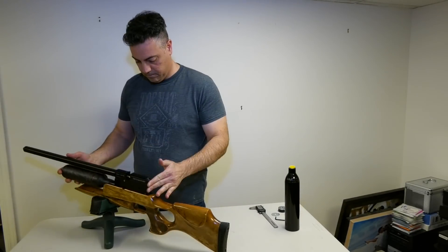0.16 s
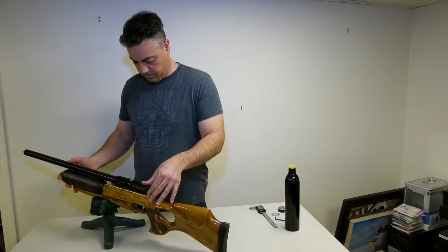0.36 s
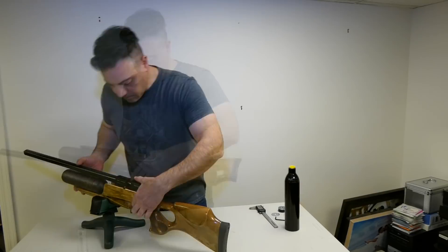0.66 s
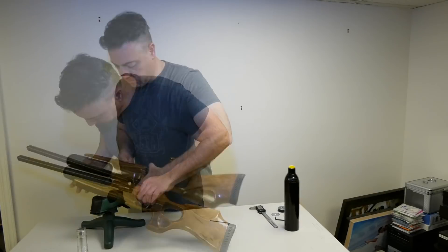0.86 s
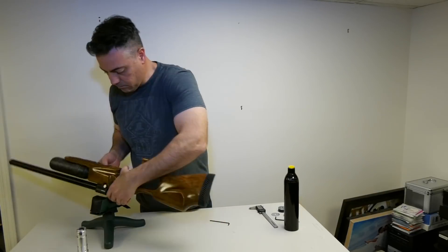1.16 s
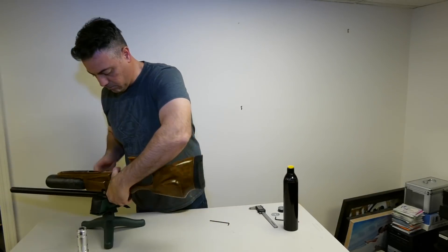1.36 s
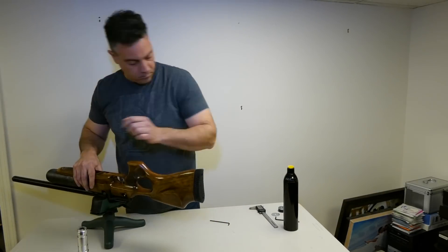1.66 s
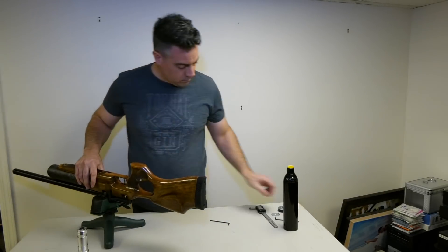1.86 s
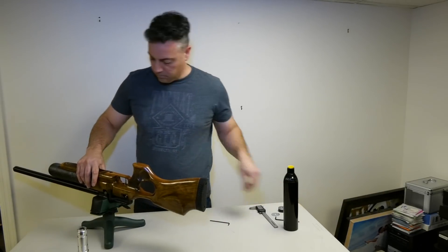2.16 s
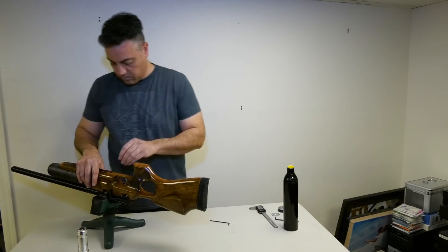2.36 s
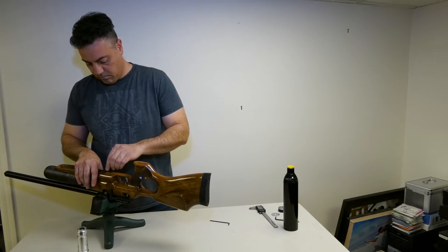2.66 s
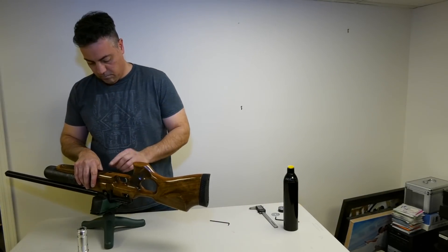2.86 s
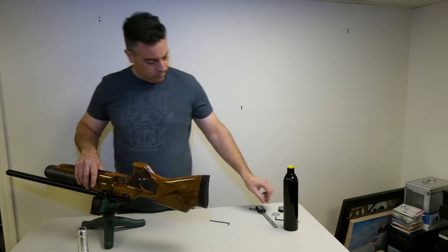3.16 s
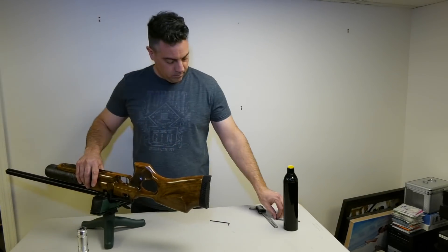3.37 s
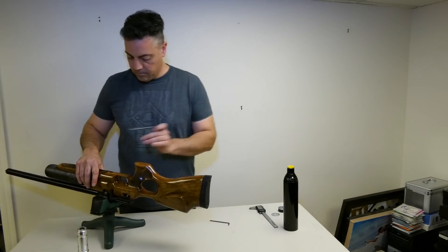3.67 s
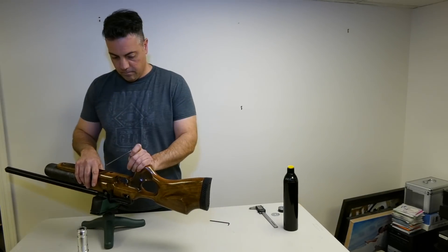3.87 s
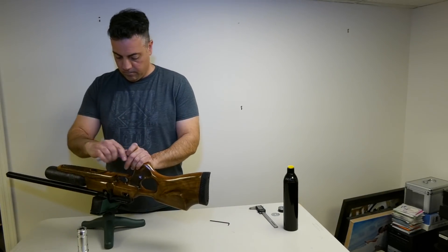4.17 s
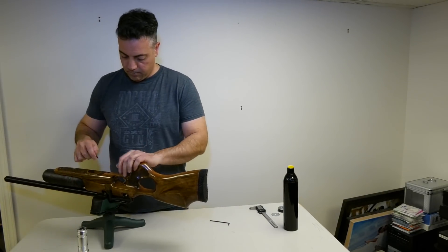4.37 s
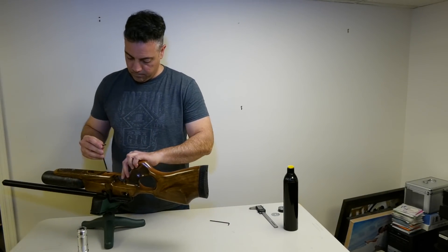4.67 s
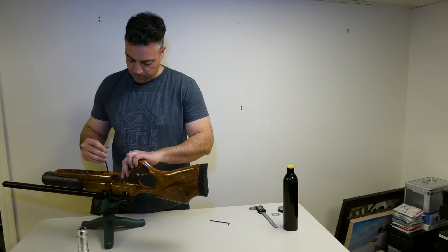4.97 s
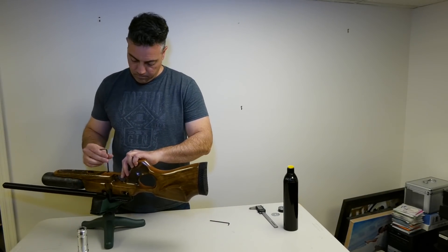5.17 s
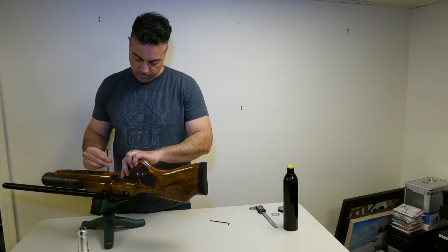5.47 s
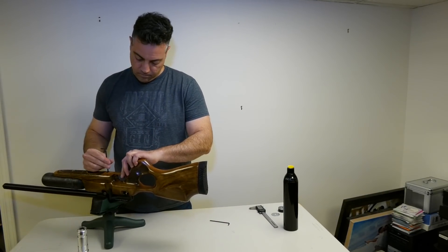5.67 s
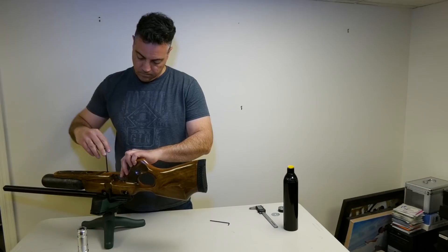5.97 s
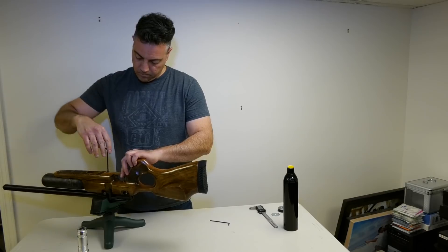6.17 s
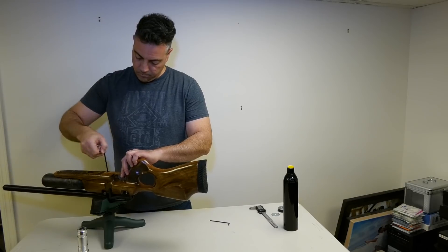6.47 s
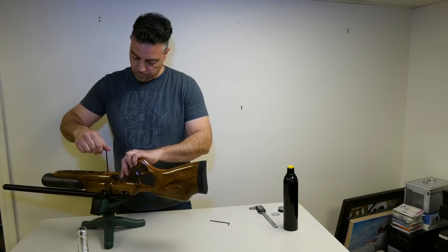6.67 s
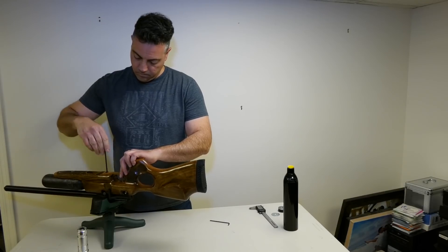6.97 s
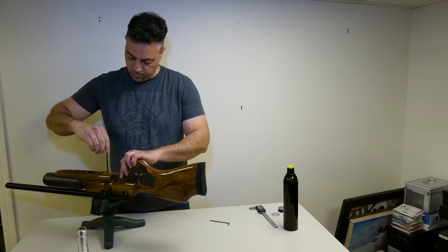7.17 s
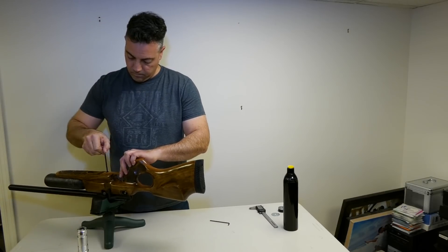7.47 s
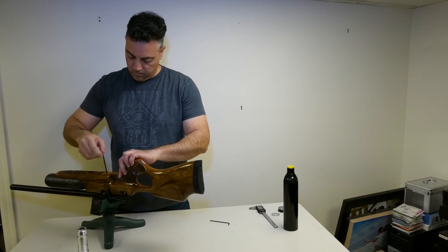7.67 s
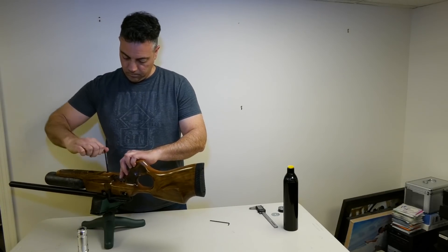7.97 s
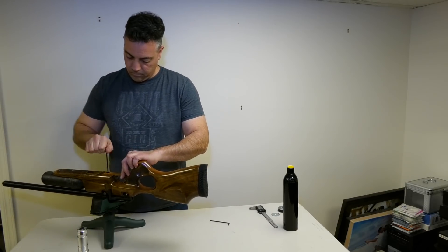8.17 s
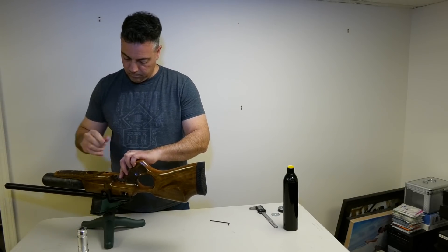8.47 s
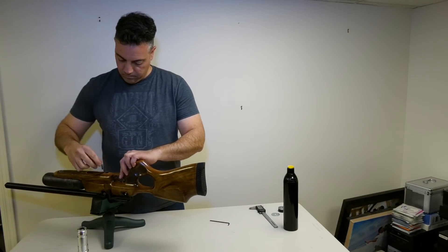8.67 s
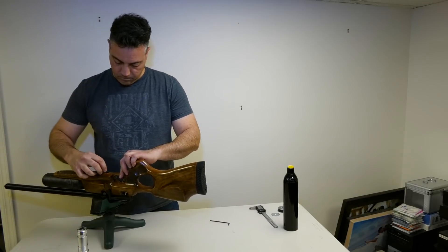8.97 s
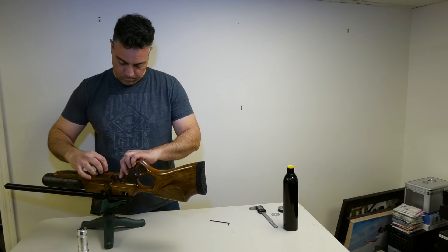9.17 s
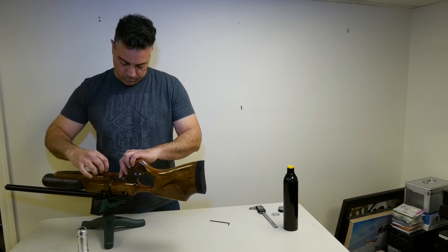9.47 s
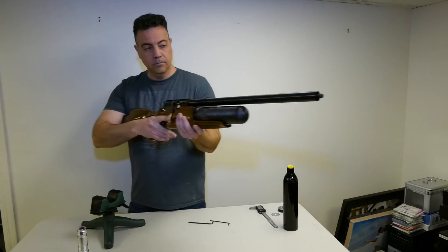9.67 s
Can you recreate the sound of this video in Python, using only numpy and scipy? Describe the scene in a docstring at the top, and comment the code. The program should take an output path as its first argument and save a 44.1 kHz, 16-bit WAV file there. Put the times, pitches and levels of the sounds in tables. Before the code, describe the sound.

From near silence a fan's airy hum fades in. Sleeves brush and a wooden gun stock bumps softly into its rest; small tools clatter on a hollow bench. A loose steel part scrapes, squeaks and rattles brightly, the tools clatter again, then a hex key ticks and grinds irregularly in a screw. Small, short-echo room, stereo microphone, action well to the left.

```python
"""An air rifle is put together on a bench in a small room, heard well to the left.
The hum and rushing air of a fan fade in over filtered noise and wavering tones; sleeve or palm brushes in fine grains.
The wooden stock bumps into its rest, a fitting ticks and small tools clatter: contact noise rings tuned resonances.
A loose steel part scrapes, squeaks and rattles into its seat by stick-slip, and the tools clatter once more.
Last, a hex key ticks and grinds in the stock screw, over a faint rumble while weight bears on it."""
import sys
import numpy as np
from scipy import signal
from scipy.fft import rfft, irfft
from scipy.io import wavfile
from scipy.ndimage import uniform_filter1d

SR = 44100
rng = np.random.default_rng(int(sys.argv[2]) if len(sys.argv) > 2 else 0)


def bounce(signal):
    """Save signal as a 16-bit WAV file at the path given by the first command-line argument."""
    frames = np.transpose(np.atleast_2d(signal))
    limited = np.clip(frames, -1, 1)
    pcm = np.round(limited * 32767).astype(np.int16)
    wavfile.write(sys.argv[1], SR, pcm)


N = 432621
TIME = np.arange(N) / SR

# spectrum of a bare steel contact: f/Hz, relative level/dB
STEEL_CONTACT = [(200, -44.5), (1300, -20.5), (1800, 5), (2250, -5.5), (2800, 7.5), (3800, -0.5), (5000, 6),
                 (6600, 4), (7900, -6.5), (9600, 2), (11500, -6.5), (16000, -17)]


def undb(db):
    """Turn decibels into amplitude gain."""
    return 10 ** (np.asarray(db) / 20)


def unit(x):
    """Scale to an energy of one."""
    return x / np.sqrt(np.sum(x ** 2))


def steady(x):
    """Scale to an rms of one."""
    return unit(x) * np.sqrt(len(x))


def through(x, response):
    """Pass a sound through an impulse response, keeping its length."""
    return signal.oaconvolve(x, response)[:len(x)]


def add(track, s, sound):
    """Mix a sound into a track at a time in seconds."""
    part = track[int(s * SR):][:len(sound)]
    part += sound[:len(part)]


def colour(points, size=4096):
    """Minimum-phase impulse response with the given (Hz, dB) spectrum, by way of its cepstrum."""
    hz, db = np.transpose(points)
    bins_hz = np.arange(size // 2 + 1) * SR / size
    level_db = np.interp(np.log(bins_hz + 1), np.log(hz), db)
    cepstrum = irfft(np.log(undb(level_db)))
    # folding the cepstrum forward makes the response causal
    cepstrum[1:size // 2] *= 2
    cepstrum[size // 2 + 1:] = 0
    return unit(irfft(np.exp(rfft(cepstrum))))


def ring(hz, width):
    """One resonance; the wider it is in Hz, the faster it fades."""
    t = TIME[:SR // 2]
    return width * np.exp(-np.pi * width * t) * np.cos(2 * np.pi * hz * t)


def body(spectrum, modes, ring_db):
    """A struck object: a broad crack and the ring of its modes."""
    ringing = sum(undb(db) * ring(hz, width) for hz, width, db in modes)
    response = undb(ring_db) * unit(ringing)
    add(response, 0, colour(spectrum))
    return unit(response)


def contact(chatter_s, size=4096):
    """One touch: a dying swarm of tiny rebounds."""
    age = TIME[:size] / max(chatter_s, 1e-4)
    rebounds = rng.standard_normal(size)
    return unit(rebounds * np.abs(rebounds) * np.exp(-age))


def soften(x, hz):
    """A softer contact loses the treble above hz."""
    lowpass = signal.butter(1, min(hz, SR / 2 - 1), fs=SR, output="sos")
    return signal.sosfilt(lowpass, x)


def walk(rate):
    """Slow chance: random levels, rate per second, smoothed to a spread of one."""
    k = int(SR / rate)
    levels = np.repeat(rng.standard_normal(N // k + 1), k)[:N]
    return steady(uniform_filter1d(levels, k))


def room(x, wet_db, right_db, low_t60=0.17, high_t60=0.11, gap_s=0.00066, echo_right_db=-12, bass_hz=120, count=2):
    """Direct sound, count samples earlier on the right, and a short diffuse tail whose bass lasts longest."""
    # small things radiate little bass
    x = signal.sosfilt(signal.butter(2, bass_hz, "high", fs=SR, output="sos"), x)
    t = TIME[:SR // 3]
    onset = 1 - np.exp(-(t / gap_s) ** 2)
    tails = []
    for noise in rng.standard_normal((2, len(t))):
        low = soften(noise, 570)
        tail = low * undb(-60 * t / low_t60) + (noise - low) * undb(-60 * t / high_t60)
        tails.append(undb(wet_db) * through(x, unit(tail * onset)))
    left = x + tails[0]
    right = undb(right_db) * np.roll(x, -count) + undb(echo_right_db) * tails[1]
    return np.array([left, right])


def fan(air_db=-43, hum_db=0, waver_db=1.5, flutter_db=2.5, right_db=-14, diffuse_db=-15, bass_db=-66, rumble_db=-76):
    """Rushing air with wavering tones; the right side hears it partly through the room."""
    # spectrum of the rushing air: f/Hz, relative level/dB
    air_spectrum = [(25, -10), (55, -23), (90, -12), (125, -13.5), (230, -2), (320, -1), (430, 1.5),
                    (600, 2.5), (790, 0.5), (1030, 1), (1370, -5.5), (2300, -10), (5000, -18.5),
                    (16000, -28)]
    # tones of the motor and blades: f/Hz, wander/Hz, relative rms level/dB
    tones = [(392, 2.2, -50.5), (872, 2.8, -59), (944, 3.28, -57), (969, 2.99, -53.5), (1040, 2.886, -56.5),
             (1097, 3.15, -56.5), (1232, 6.08, -59.5), (1476, 11.88, -60), (1547, 3.95, -62),
             (1937, 1.89, -64), (14250, 40, -82)]
    air, diffuse = (steady(through(rng.standard_normal(N), colour(air_spectrum))) * undb(air_db) for _ in range(2))
    hum = 0
    for hz, wander_hz, db in tones:
        pitch_hz = hz + wander_hz * walk(20)
        tone = np.sin(2 * np.pi * np.cumsum(pitch_hz) / SR)
        hum = hum + undb(db + hum_db) * steady(tone * undb(flutter_db * walk(10)))
    near = air * undb(waver_db * walk(2.96)) + hum
    far = undb(right_db) * np.roll(near, -2) + undb(diffuse_db) * diffuse
    # two standing waves of the room reach both sides alike
    waves = [(93.0, 22, rumble_db), (212.4, 29, bass_db)]
    boom = sum(undb(db) * steady(through(rng.standard_normal(N), ring(hz, width))) for hz, width, db in waves)
    return np.array([near, far]) + boom


def hiss(db=-73):
    """Each microphone has its own faint hiss: independent white noise."""
    return undb(db) * rng.standard_normal((2, N))


def sweeps(rows):
    """Gain of passing sweeps: each swells to its fastest moment and fades; their powers add."""
    power = np.zeros(N)
    for s, rise_s, fall_s, db in rows:
        away = np.maximum((s - TIME) / rise_s, (TIME - s) / fall_s)
        power += (undb(db) * np.exp(-away)) ** 2
    return np.sqrt(power)


def brushing(grain_db=3, uneven_db=1):
    """Cloth and skin catch and let go in countless tiny grains."""
    # spectrum of the brushing: f/Hz, relative level/dB
    cloth = [(200, -27), (1000, 0.5), (2500, -0.5), (5000, -1), (9000, -4.5), (16000, -12.5)]
    # a sleeve or palm passing over the stock: fastest at t/s, speeding up/s, slowing down/s, relative level/dB
    passes = [(0.64, 0.058, 0.11, -52.5), (0.88, 0.053, 0.039, -42), (1.36, 0.075, 0.17, -42),
              (1.358, 0.008, 0.01, -33), (1.41, 0.006, 0.015, -37), (1.457, 0.005, 0.017, -35),
              (1.78, 0.063, 0.25, -41.5), (3.09, 0.009, 0.03, -36), (3.15, 0.036, 0.14, -43.5),
              (3.9, 0.012, 0.05, -48), (4.02, 0.04, 0.023, -47), (4.45, 0.45, 0.085, -54),
              (9.66, 0.12, 0.14, -52), (9.805, 0.018, 0.05, -35.5)]
    grains = rng.standard_normal(N) * undb(grain_db * walk(600) + uneven_db * walk(24.68))
    rustle = steady(through(grains, colour(cloth)))
    return room(rustle * sweeps(passes), wet_db=-3.5, right_db=-39)


def stock(blow_db=23.0, thud_db=-3, thud_hz=600, grip_shift=0.028):
    """Dull bumps of the wooden stock in its padded rest: the weight lands softly while the surfaces chatter."""
    # bumping and dragging in the rest: t/s, relative level/dB, hardness f/Hz, chatter decay/s
    bumps = [(1.346, -21.5, 1200, 0.0013), (1.352, -15, 990, 0.011), (1.365, -21, 600, 0.024),
             (1.392, -41, 400, .008), (1.412, -24, 2500, 0.0057), (1.425, -29, 600, .012),
             (1.445, -22, 2000, 0.012), (1.459, -28, 600, .014), (1.568, -36, 2500, .005),
             (1.589, -37, 250, 0.0077), (3.891, -41, 400, .008), (5.712, -30.5, 220, 0.0097),
             (6.695, -29.5, 80, 0.011), (7.001, -32, 110, 0.01), (7.255, -32.5, 130, 0.01),
             (7.291, -31, 110, 0.022), (7.49, -33, 300, 0.012), (7.983, -25, 420, .005),
             (8.52, -33.5, 119, 0.02)]
    # resonances of the stock: f/Hz, width/Hz, relative level/dB
    wood_modes = [(141, 9.4, -7), (193, 39, -16), (243, 43, 2.5), (308, 18, 5.5), (463.5, 15.4, 13),
                  (518, 12, -7), (574, 15, 7.5), (1070, 65, 0.5)]
    # spectrum of its bare contact: f/Hz, relative level/dB
    wood_contact = [(50, -54), (110, -19.5), (210, 0.5), (520, -2), (750, -8.5), (1200, -2), (2500, -9.5),
                    (5000, 3.5), (16000, -32)]
    track = np.zeros(N)
    for s, db, hz, chatter_s in bumps:
        # the hands hold it differently each time, which shifts its resonances a little
        held = [(f * np.exp(grip_shift * rng.standard_normal()), width, mode_db) for f, width, mode_db in wood_modes]
        wood = body(wood_contact, held, ring_db=-6)
        thud = undb(thud_db) * unit(soften(soften(wood, thud_hz), hz))
        chatter = unit(through(soften(wood, hz), contact(chatter_s)))
        bump = unit(soften(thud + chatter, 2 * hz))
        add(track, s, undb(db + blow_db) * bump)
    return room(track, wet_db=-5.0, right_db=-18.0, echo_right_db=-7.5)


def ticks(rows, modes, ring_db, creep_db, creep_s=0.003, place_db=2, size=1024, count=300):
    """Each tick is a swell of tiny slips, with creep from count samples before; its place decides which modes ring."""
    track = np.zeros(N)
    t = (np.arange(size) - count) / SR
    for s, db, build_s, body_db, treble_db in rows:
        age = np.maximum(t, 0) / max(build_s, 1e-4)
        creep = undb(creep_db) * np.exp(-np.abs(t - build_s) / creep_s)
        swell = age * np.exp(1 - age) + creep
        slips = rng.standard_normal(size) * swell
        struck = [(hz, width, mode_db + place_db * rng.standard_normal()) for hz, width, mode_db in modes]
        tint = colour([(2000, body_db), (2700, 0), (6500, 0), (9000, treble_db)])
        tick = unit(through(through(body(STEEL_CONTACT, struck, ring_db), slips), tint))
        add(track, s + t[0], undb(db) * tick)
    return track


def fidgets(db=-41, spread_db=3, build_s=0.0012, body_db=6, treble_db=-4, count=20):
    """Rows of faint ticks at chance moments, as the key shifts in its socket."""
    from_s, until_s = 4.4, 9.75  # the key is in the hand
    rows = []
    for when, force in rng.random((count, 2)):
        s = from_s + when * (until_s - from_s)
        rows.append((s, db + spread_db * (2 * force - 1), build_s, body_db, treble_db))
    return rows


def sliding(modes, ring_db, dull_hz, slip_spread_db=5, slips_per_s=3000):
    """Stick-slip friction: a dense, uneven train of slips ringing the steel."""
    moments = rng.random(N) < slips_per_s / SR
    slips = moments * rng.choice([-1, 1], N) * undb(slip_spread_db * rng.standard_normal(N))
    dulled = soften(soften(slips, dull_hz), dull_hz)
    return steady(through(dulled, body(STEEL_CONTACT, modes, ring_db)))


def strokes(rows, attack_share, release_s):
    """Gain of sliding strokes: each gathers speed over a share of its length, holds, then dies away."""
    gain = np.zeros(N)
    for s, length_s, db in rows:
        attack = np.clip((TIME - s) / (attack_share * length_s), 0, 1)
        release = np.exp(-np.maximum(TIME - s - length_s, 0) / release_s)
        gain += undb(db) * attack * release
    return gain


def steel(tick_db=18, grind_db=-2):
    """Small fittings tick, and the hex key ticks and grinds in the screw head, ringing the steel action."""
    # key, screw and fittings: t/s, relative level/dB, build-up/s, extra body/dB, extra treble/dB
    clicks = [(1.6252, -26.5, 0.0016, 13, 6), (3.9835, -34, 0.00055, 1, 0), (4.4635, -39, 0.0005, 15, 19),
              (4.867, -17, 0.002, -6, 4.5), (4.899, -34, 0.0015, -2, -4), (4.9334, -32.5, 0.0002, 3, -22),
              (5.0332, -7.5, 0.00056, 5, 4), (5.0369, -21, 0.00041, -3, 0), (5.1005, -23, 0.001, 3, 6),
              (5.1054, -18, 0.00043, 7, -7), (5.1658, -12.5, 0.00097, 3.5, -1.5),
              (5.1846, -18.5, 0.0015, 1, -18), (5.2712, -29, 0.0011, 7, -10),
              (5.3405, -19, 0.0036, 3.5, -2.5), (5.455, -19, 0.0016, 7, 10), (5.4936, -28.5, 0.0015, 3, 3),
              (5.5448, -15.5, 0.0018, 4.5, -2.5), (5.5767, -24.5, 0.0011, 14, 5),
              (5.6972, -15.5, 0.00064, 17.5, 3.5), (5.7033, -8.5, 0.00045, -6, -3),
              (6.0168, -21, 0.001, 6, 5), (6.5207, -30, 0.001, 12, -4), (6.6354, -34, 0.0017, 9, -9),
              (7.0044, -31, 0.00075, 9, -4), (7.0336, -17.5, 0.0039, 15.5, 1),
              (7.9844, -26, 0.00041, 20, -10), (8.358, -20, 0.00072, -6, 0), (8.4434, -24, 0.0009, -1.5, 8),
              (8.4553, -8.5, 0.00017, -8, -3), (8.9781, -20, 0.0023, -7, 4),
              (9.0145, -24.5, 0.00088, -2, -8), (9.0245, -24, 0.00048, 0, 7),
              (9.0391, -19.5, 0.00037, -9, -3), (9.1483, -18.5, 0.0008, 0, 2), (9.191, -32, 0.002, -2, -3),
              (9.2735, -33.5, 0.00096, 18, -5), (9.3562, -29, 0.00041, -27, 1.5),
              (9.6113, -31.5, 0.00032, 8, 10)]
    # turns that grind the screw in its thread: t/s, length/s, relative level/dB
    turns = [(4.4, 0.16, -53.5), (5.6, 0.034, -46), (5.76, 0.037, -49.5), (6.13, 0.05, -50),
             (6.41, 0.16, -49.5), (6.68, 0.07, -52.5), (7.28, 0.1, -48.5), (7.44, 0.12, -51.5),
             (7.62, 0.13, -56), (9.42, 0.11, -53)]
    # resonances of the action: f/Hz, width/Hz, relative level/dB
    action_modes = [(1830, 115, 8), (2270, 72, 4), (2700, 83, 10), (3260, 130, 3.5), (3820, 27, 0),
                    (4560, 130, 4.5), (4930, 37, 6.5), (5200, 43, -15), (6060, 180, 1), (6550, 22, -18),
                    (6720, 63, -4), (7250, 25, -4), (8400, 100, -10), (9360, 110, -12), (12250, 131, -5)]
    track = undb(tick_db) * ticks(clicks + fidgets(), action_modes, ring_db=-6.5, creep_db=-19.5)
    grind = sliding(action_modes, ring_db=-3, dull_hz=7000, slip_spread_db=7, slips_per_s=700)
    turning = strokes(turns, attack_share=0.14, release_s=0.015)
    return room(track + undb(grind_db) * turning * grind, wet_db=-5.5, right_db=-29.0)


def bench(blow_db=21, light_share=0.083):
    """Tools chatter and drag on the hollow bench top; the harder the contact, the less bass it moves."""
    # small tools set down and picked up: t/s, relative level/dB, hardness f/Hz, chatter decay/s
    clatter = [(2.0644, -20, 4000, 0.0052), (2.076, -13.5, 4930, 0.016), (2.081, -10, 3000, 0.005),
               (3.369, -21, 900, 0.0094), (3.381, -20, 300, 0.0069), (3.414, -16.5, 4000, 0.022),
               (3.441, -15.5, 3000, 0.017), (3.45, -9.5, 8160, 0.019), (3.464, -11, 7960, 0.011),
               (3.506, -15.5, 3000, 0.017), (3.513, -14, 4000, 0.0094), (3.533, -26, 1200, 0.0051)]
    # resonances of the bench top: f/Hz, width/Hz, relative level/dB
    top_modes = [(334, 12, -4.5), (464, 11, 5.5), (616, 12, 6), (706, 32, -6), (1165, 20, 9),
                 (1250, 42, -1), (1434, 55, 2), (1720, 67, -2), (2620, 110, -21), (4300, 400, -6)]
    # spectrum of its bare contact: f/Hz, relative level/dB
    top_contact = [(100, -43), (400, -1.5), (700, -4.5), (900, -3), (1250, 1), (2000, -3), (3300, -7.5),
                   (4500, -2.5), (6000, -9), (8000, -15), (16000, -17.5)]
    track = np.zeros(N)
    top = body(top_contact, top_modes, ring_db=-7.5)
    for s, db, hz, chatter_s in clatter:
        struck = soften(top - soften(top, light_share * hz), hz)
        add(track, s, undb(db + blow_db) * unit(through(struck, contact(chatter_s))))
    return room(track, wet_db=-4.5, right_db=-16)


def loose_part(knock_db=20, scrape_db=-1, squeak_width_hz=350, glint_db=6):
    """A steel part scrapes, squeaks as it binds and rattles into its seat, by slips that ring its modes."""
    # knocks into place: t/s, relative level/dB, build-up/s, extra body/dB, extra treble/dB
    rattle = [(2.5535, -20.5, 0.0016, -21, -27), (2.5909, -20.5, 0.00099, 9, -23),
              (2.6062, -21, 0.00046, -8, -20), (2.6712, -10.5, 0.0014, -21, 7),
              (2.6748, -10.5, 0.0021, -0.5, 1), (2.7117, -13.5, 0.0011, 0, 3), (2.7226, -17, 0.00083, 2, 6),
              (2.7433, -6, 0.00023, 1, -7), (2.75, -8.5, 0.0004, -11, 7), (2.7529, -14, 0.00093, 0, -4),
              (2.7978, -16, 0.0005, -10, -1), (2.8049, -5.5, 0.0002, -9, 3.5),
              (2.8139, -4.5, 0.00028, -12, -1), (2.8194, -5.5, 0.0005, -11, 23),
              (2.83, -3.5, 0.00058, -17, 5), (2.8827, -6.5, 0.00088, -9, -15),
              (2.8999, -3.5, 0.00019, -9, -2), (2.9327, -16, 0.00046, -7, -1),
              (2.9435, -6.5, 0.00039, -8, 6.5)]
    # pushes that slide it along: t/s, length/s, relative level/dB
    pushes = [(2.544, 0.042, -27), (2.668, 0.039, -31), (2.705, 0.018, -37), (2.752, 0.023, -27.5),
              (2.812, 0.13, -15.5)]
    # squeaks as it binds: t/s, length/s, f/Hz, relative level/dB
    squeaks = [(2.64, 0.03, 4870, -30.5), (2.665, 0.0087, 4180, -21)]
    # resonances of the part: f/Hz, width/Hz, relative level/dB
    part_modes = [(1810, 80, 2), (2230, 78, -1), (2690, 57, 7.5), (3150, 210, -5.5), (3250, 170, 1.5),
                  (4230, 220, 6), (4720, 71, 3), (5180, 110, 4), (6060, 65, -14), (5900, 110, -28),
                  (7060, 81, -1.5), (8640, 240, -12), (10900, 260, -13)]
    track = undb(knock_db) * ticks(rattle, part_modes, ring_db=0.0, creep_db=-15)
    pushing = strokes(pushes, attack_share=0.29, release_s=0.0095)
    track += undb(scrape_db) * pushing * sliding(part_modes, ring_db=-1.0, dull_hz=10700)
    for s, length_s, hz, db in squeaks:
        squeak = through(rng.standard_normal(int(length_s * SR)), ring(hz, squeak_width_hz))
        add(track, s, undb(db) * steady(squeak * signal.windows.tukey(len(squeak))))
    left, right = room(track, wet_db=-7.0, right_db=-16.5, echo_right_db=-11.0)
    # the top treble spreads to the right
    glint = undb(glint_db) * (right - soften(right, 15400))
    return np.array([left, right + glint])


def leaning(hz=90, width_hz=35, right_db=-6):
    """The rest and bench rumble faintly, as twice-resonated noise, while weight bears on the key."""
    # bearing down on the key: t/s, length/s, relative level/dB
    leans = [(4.6, 1.97, -67)]
    resonance = ring(hz, width_hz)
    rumble = steady(through(through(rng.standard_normal(N), resonance), resonance))
    return rumble * strokes(leans, attack_share=0.27, release_s=0.15) * undb([[0], [right_db]])


def scene():
    """All sources in the room, faded in from silence."""
    fade_from_s, fade_s, overall_db = 0.39, 0.7, -0.5
    fade = undb(overall_db) * np.clip((TIME - fade_from_s) / fade_s, 0, 1)
    return (fan() + hiss() + brushing() + stock() + steel() + bench() + loose_part() + leaning()) * fade


def record(dry, threshold_db=-24, squeeze=0.54, window_s=0.072, release_db_per_s=5):
    """Gain control led by the left side ducks under loud sounds and creeps back; peaks clip and the top is cut."""
    top_hz = 16000
    size = int(window_s * SR)
    # mean power over the window just past
    power = uniform_filter1d(dry[0] ** 2, size, origin=(size - 1) // 2)
    power_db = 10 * np.log10(np.abs(power) + 1e-12)
    over_db = squeeze * np.maximum(power_db - threshold_db, 0)
    # ducks at once, then recovers at a steady rate
    recovery_db = release_db_per_s * TIME
    duck_db = np.maximum.accumulate(over_db + recovery_db) - recovery_db
    clipped = np.clip(dry * undb(-duck_db), -1, 1)
    return signal.sosfilt(signal.ellip(8, .2, 70, top_hz, fs=SR, output="sos"), clipped)


dry = scene()
out = record(dry)
bounce(out)
```